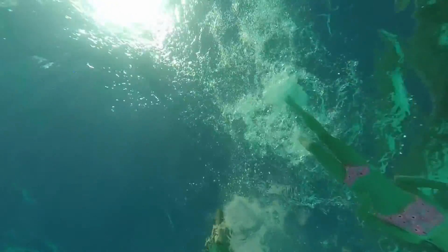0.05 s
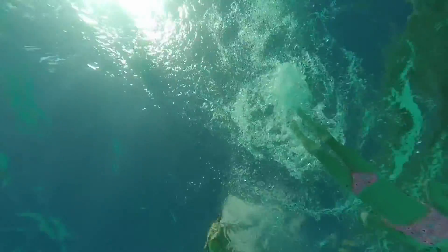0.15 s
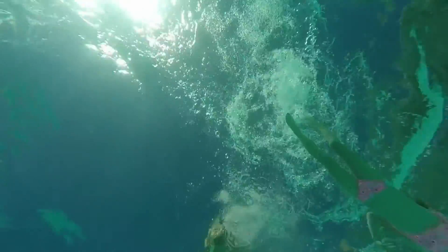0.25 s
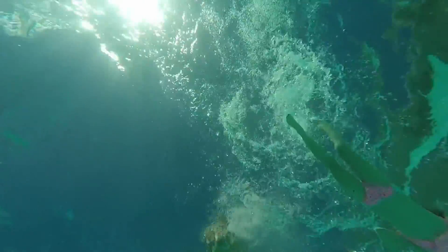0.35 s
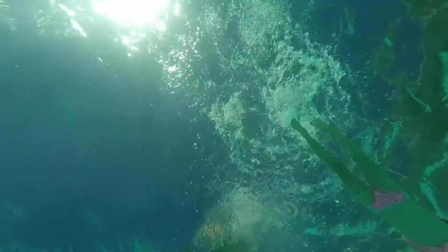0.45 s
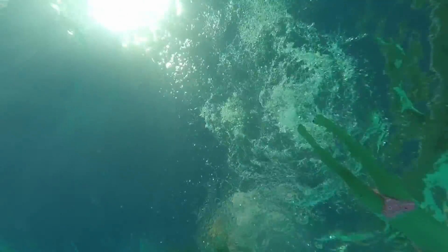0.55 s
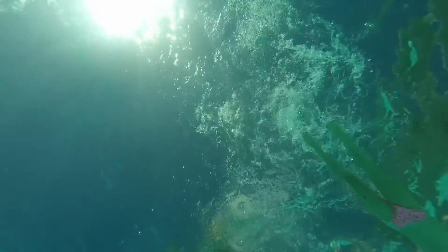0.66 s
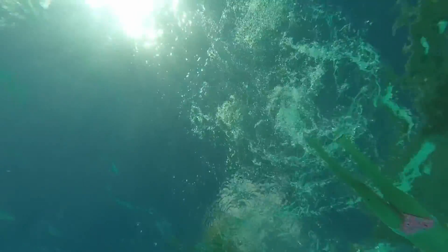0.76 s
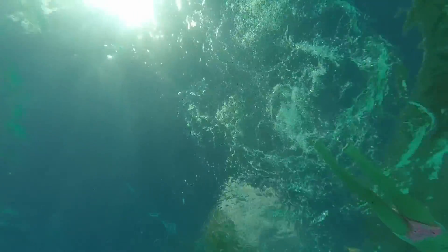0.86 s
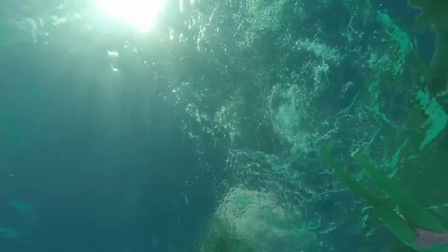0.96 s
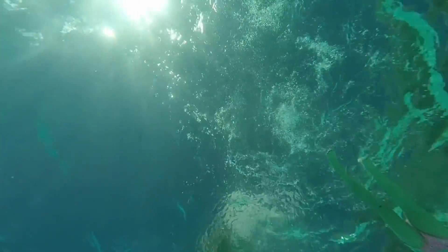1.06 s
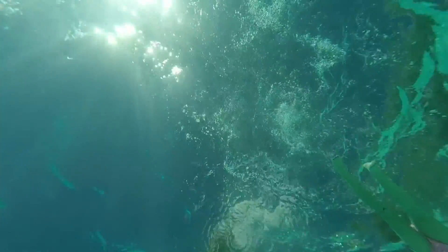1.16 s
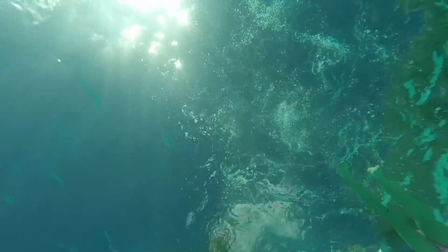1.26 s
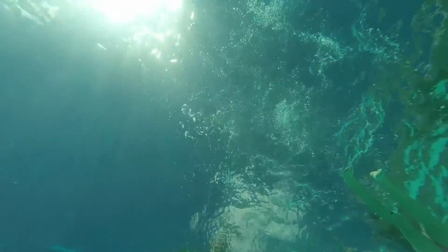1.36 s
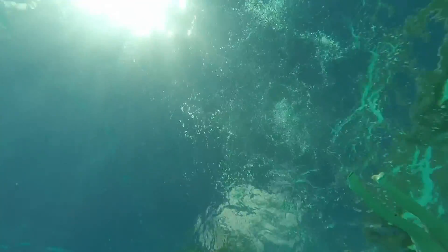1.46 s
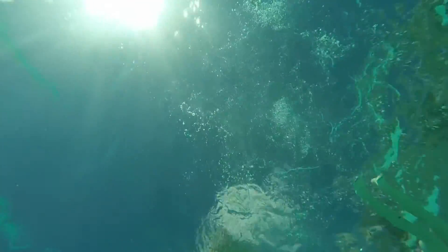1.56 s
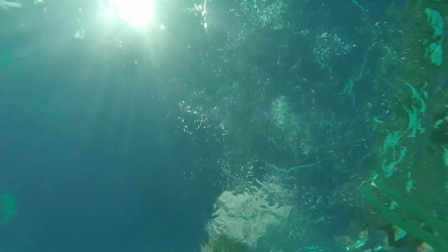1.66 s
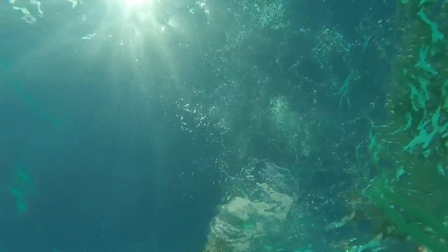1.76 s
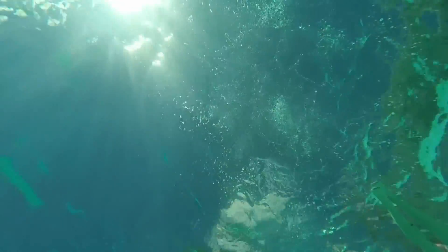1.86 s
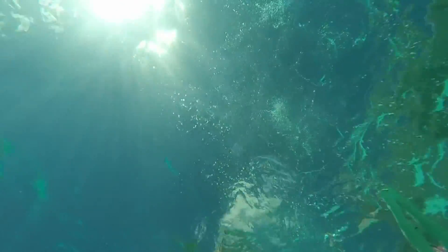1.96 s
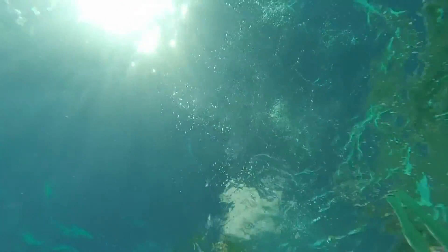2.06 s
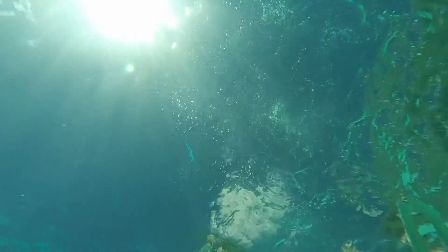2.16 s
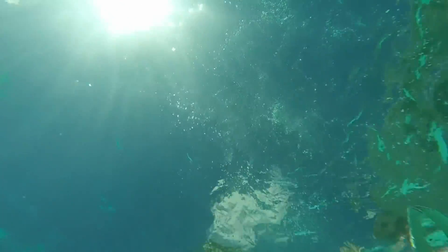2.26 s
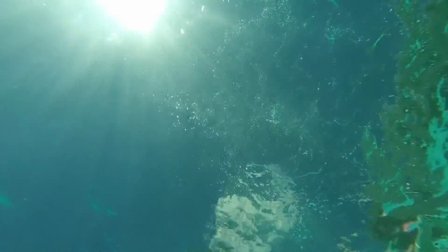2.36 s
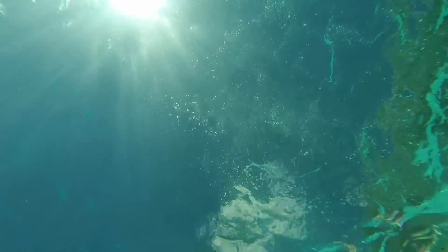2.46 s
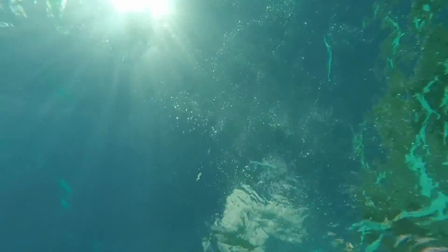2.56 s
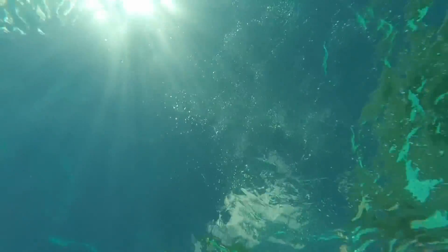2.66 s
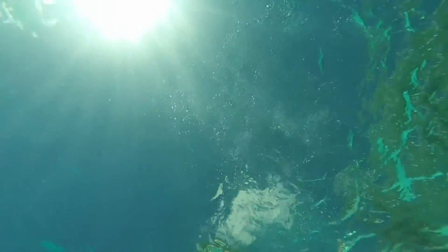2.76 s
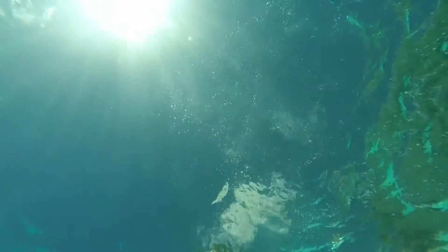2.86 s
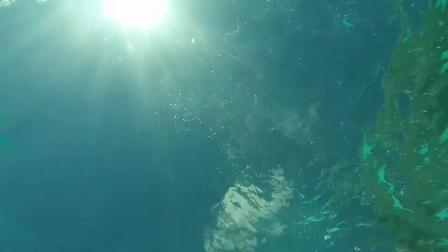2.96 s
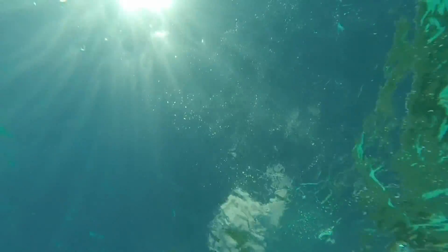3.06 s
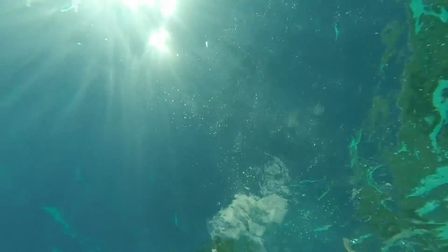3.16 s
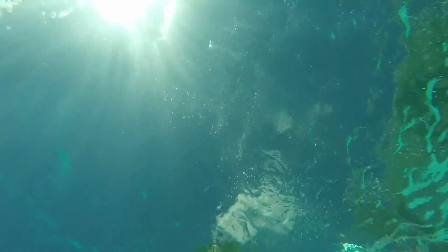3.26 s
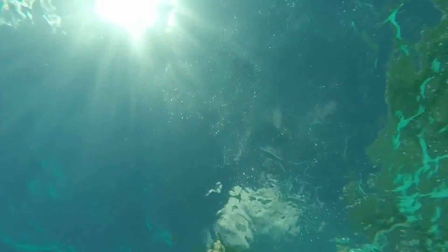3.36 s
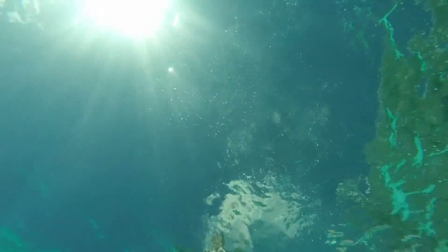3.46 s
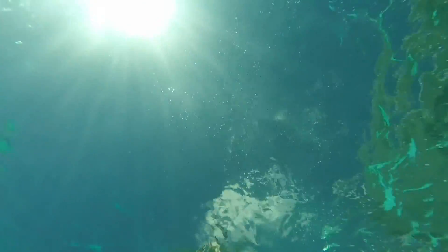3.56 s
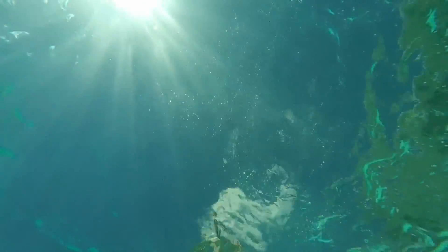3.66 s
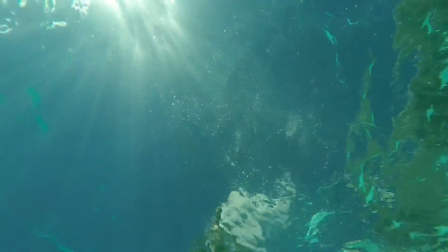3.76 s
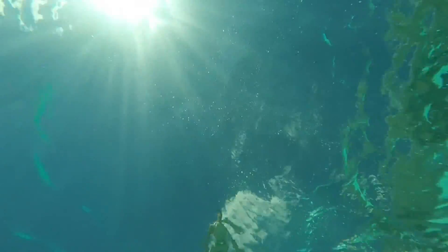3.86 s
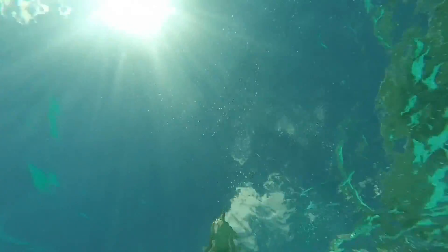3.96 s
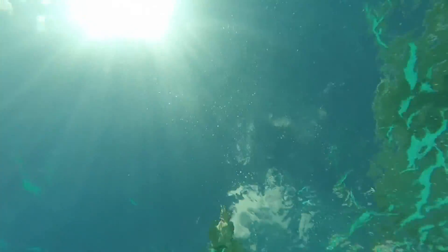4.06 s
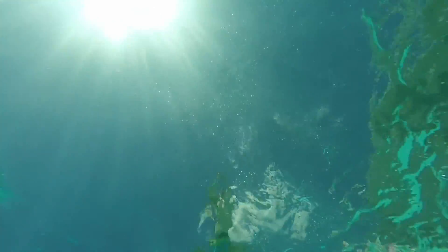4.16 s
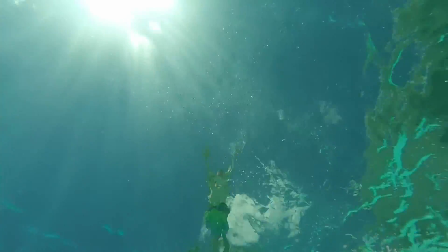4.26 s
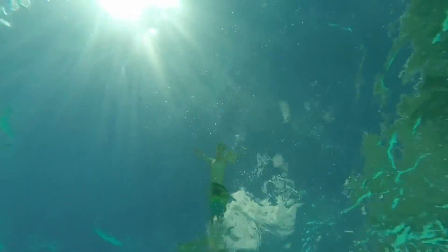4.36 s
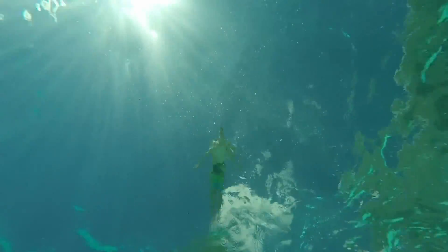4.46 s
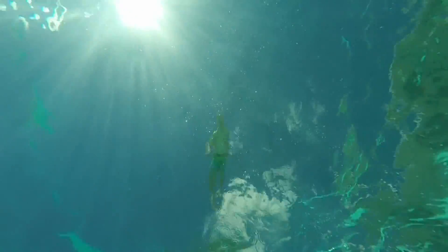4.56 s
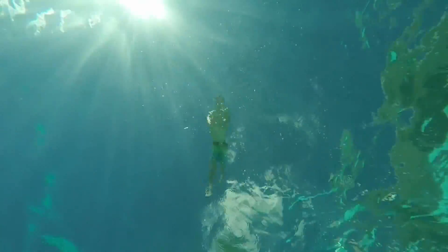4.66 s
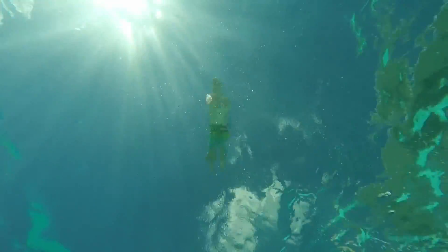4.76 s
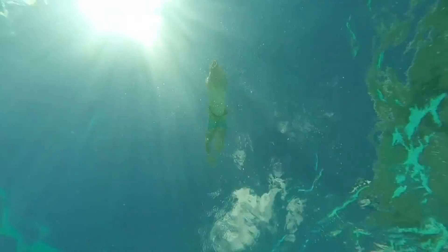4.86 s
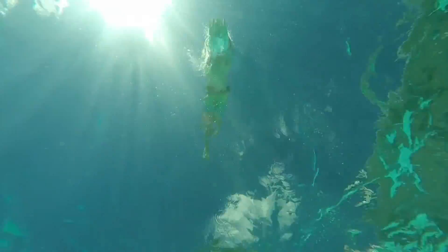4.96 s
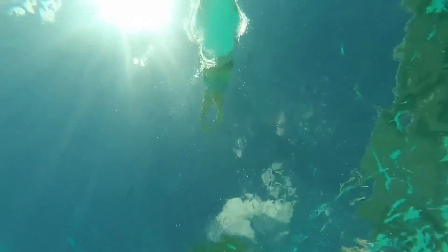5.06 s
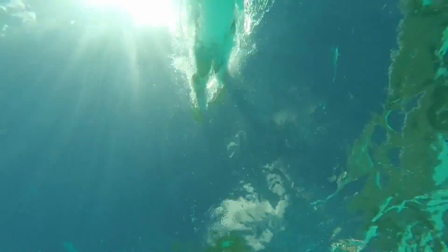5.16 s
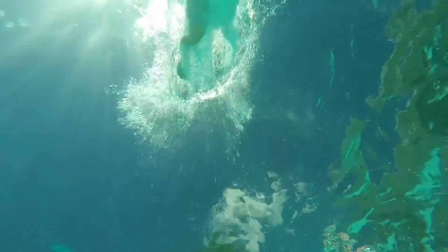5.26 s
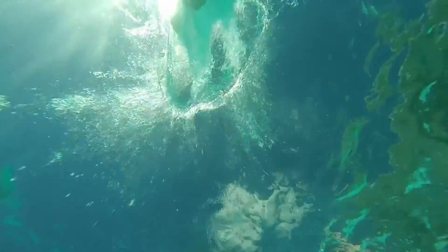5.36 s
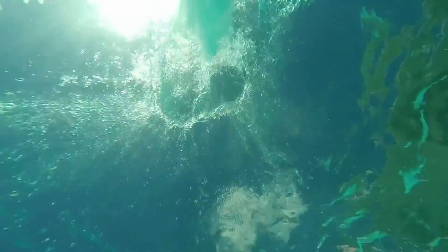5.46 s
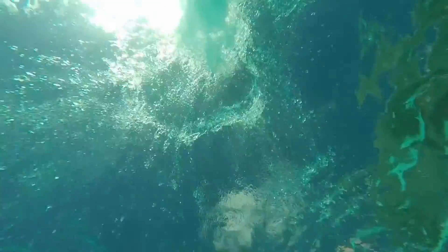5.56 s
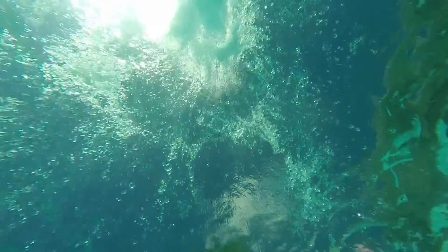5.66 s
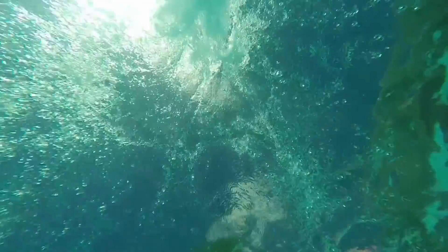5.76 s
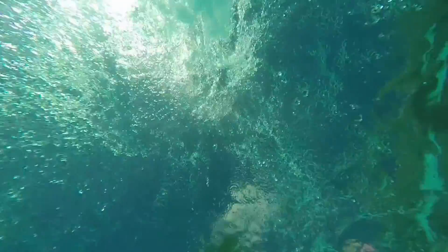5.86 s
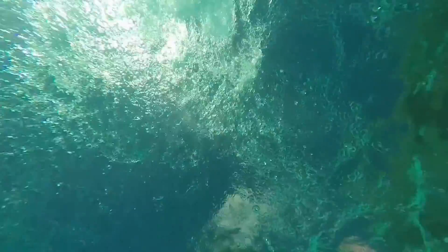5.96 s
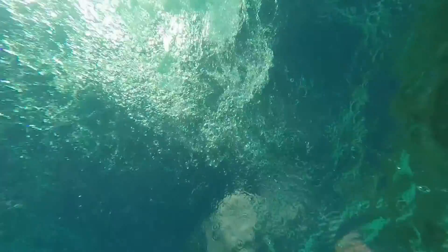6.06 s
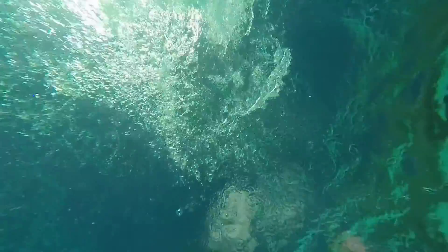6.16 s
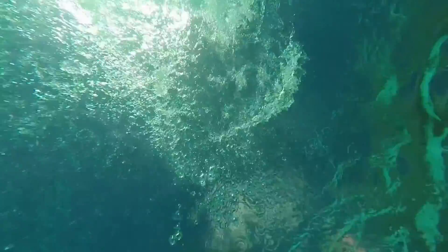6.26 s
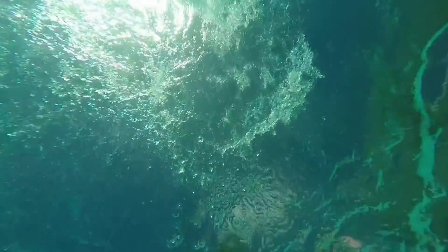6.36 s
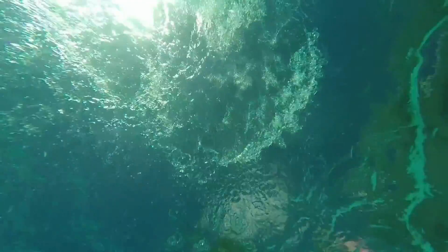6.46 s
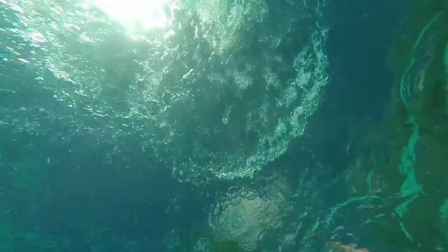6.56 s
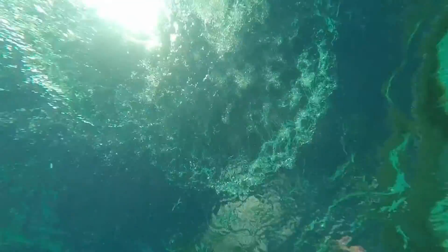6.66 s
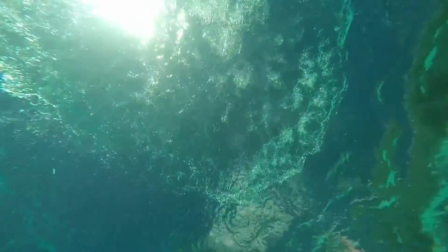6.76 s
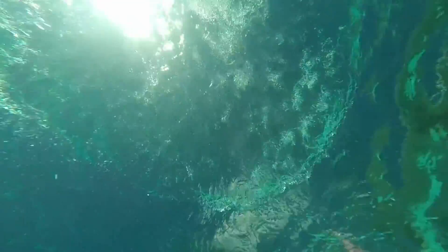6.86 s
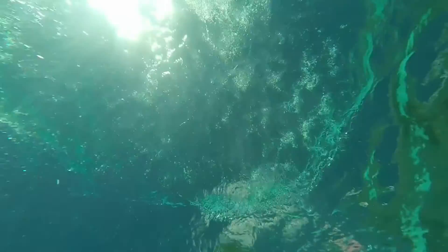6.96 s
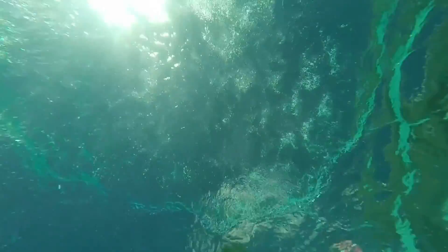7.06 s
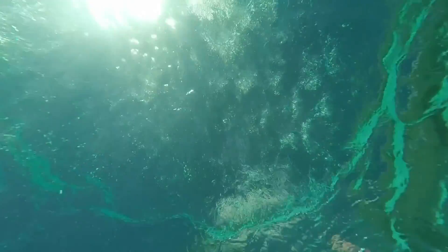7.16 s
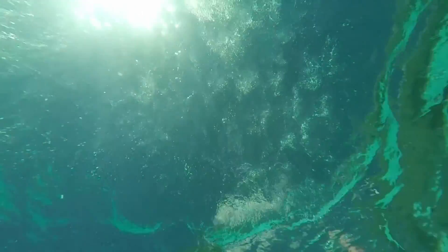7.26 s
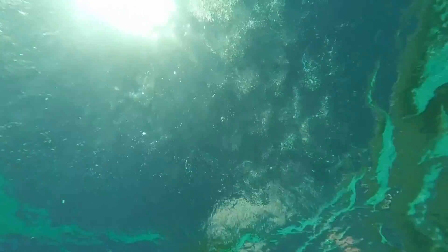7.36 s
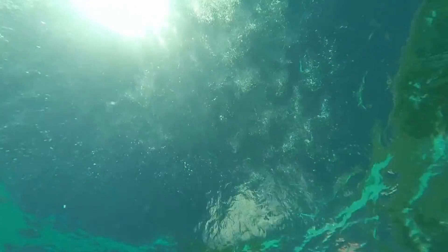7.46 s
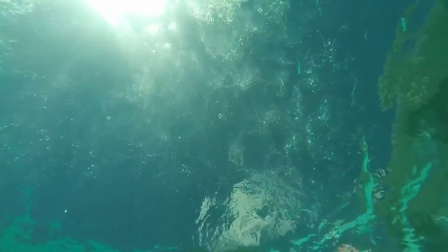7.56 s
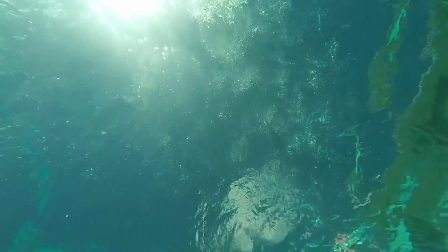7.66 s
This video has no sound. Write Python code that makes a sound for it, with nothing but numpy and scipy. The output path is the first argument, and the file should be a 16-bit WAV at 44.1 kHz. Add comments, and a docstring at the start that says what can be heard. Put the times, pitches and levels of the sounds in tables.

```python
"""Under water, inside a sealed housing, as swimmers jump into the sea.
First a big air pocket bloops and a bubble cloud (short gliding rings over a noise wash) gurgles and fizzes away.
Then a second jumper plunges in: low booms (swelling sines) rock the housing and another cloud builds and fades.
Throughout, single bubbles pop and plink, and a hum, a low stir and hiss lie beneath.
The housing's gain curve muffles clouds, pops, knocks and stray bubbles."""
import sys
import numpy as np
from scipy.fft import rfft, irfft, next_fast_len
from scipy.io import wavfile
from scipy.ndimage import map_coordinates

SR = 44100
rng = np.random.default_rng(int(sys.argv[2]) if len(sys.argv) > 2 else 0)


def to_wav(sig):
    """Store sig (one row per channel, or 1-D mono) as 16-bit WAV at the path in sys.argv[1].

    Samples outside -1..1 are clipped; the rate is SR.
    """
    pcm = np.clip(np.atleast_2d(sig), -1, 1) * 32767
    pcm = np.round(pcm).astype(np.int16)
    wavfile.write(sys.argv[1], SR, pcm.T)  # frames by channels


N = 340452

# hiss spectrum, relative: pitch_hz, density_db
HISS_SPECTRUM = [(100, 9), (600, 12.5), (3000, 7), (7000, 0), (13000, -4), (14300, 1.5), (15000, -6.5)]
# faint far metallic rings: start_s, level_db, hardness_db_per_octave (tilt up the modes)
METAL_STRIKES = [(1.241, -47.5, 7), (1.829, -42, -5), (2.545, -49, 4), (3.331, -47, -4)]
# modes of the metal: pitch_hz, relative_level_db (before the hardness tilt), t60_s
METAL_MODES = [(465, 1, 1.0), (488, -8, 1), (776, -11.5, 0.49), (1410, -19, 0.38)]
# pushes of water that swing the housing: start_s, pitch_hz, peak_db, length_s
HOUSING_SWINGS = [(0.293, 44.7, -15.5, 0.056), (0.785, 59.4, -26, 0.091), (0.863, 44.2, -28.5, 0.13),
                  (1.438, 46.6, -31, 0.12), (1.62, 44, -17, 0.14), (1.745, 77, -27, 0.1),
                  (1.827, 38.6, -22, 0.28), (2.091, 60, -20.5, 0.057), (3.377, 43.5, -31, 0.25),
                  (3.616, 45.8, -28, 0.38), (4, 44.3, -8.5, 0.15), (3.993, 72.7, -15.5, 0.13),
                  (4.209, 70.5, -7, 0.037), (4.251, 82.1, -22, 0.18), (4.256, 43.4, -13.5, 0.2),
                  (4.389, 43.5, -5.5, 0.17), (4.542, 43.6, -9, 0.21), (4.714, 44.5, -13, 0.21),
                  (4.858, 43.9, -7.5, 0.14), (4.992, 45.1, -8.5, 0.17), (5.088, 37.8, -3.5, 0.075),
                  (5.158, 37.5, -7, .11), (5.247, 33.7, -2, 0.087), (5.411, 29.6, -13, 0.098),
                  (5.546, 37.7, -23.5, 1), (6.319, 45, -10.5, 0.099), (6.853, 41, -22.5, 0.087),
                  (7.523, 45.4, -22.5, 0.055)]
# gain through the housing walls: pitch_hz, gain_db
WALL_GAIN = [(30, 2), (200, -1), (350, 4), (470, -11.5), (780, -13.5), (1350, -15), (2000, -19.5),
             (3400, -25), (4300, -30), (5400, -36), (6400, -53.5), (8200, -54.5), (9200, -45.5),
             (11000, -58)]
# resonances (+) and dead bands (-) of the housing: centre_hz, width_hz, gain_db
WALL_BANDS = [(601, 50, -12.5), (826, 28, 4), (988, 120, -4.5), (1290, 37, 2.5), (1544, 22.6, -22.5),
              (2090, 60, 3.5), (2236, 142, -7.5), (2530, 58, 0), (2907, 19, -12.5), (3296, 30, 6.5),
              (4780, 160, -8.5)]
# dull knocks on the housing; the rows at 4.836 and 4.966 s are the low onsets of two bursts of air: start_s,
# relative_level_db, pitch_hz
HOUSING_KNOCKS = [(0.299, -21, 214), (1.058, -40, 335), (1.756, -26, 182), (3.326, -35, 185),
                  (3.443, -35, 199), (3.624, -32.5, 214), (3.76, -37, 227), (4.005, -32, 163),
                  (4.085, -24.5, 233), (4.209, -16, 241), (4.22, -17.5, 171), (4.255, -34.5, 201),
                  (4.382, -32, 177), (4.433, -30.5, 196.5), (4.836, -33, 323), (4.966, -28, 363)]
# sharp pops and small splashes: start_s, relative_level_db, pitch_hz, t60_s
BUBBLE_POPS = [(0.233, -35, 3350, 0.047), (0.271, -33, 890, 0.05), (0.77, -57, 2090, .055),
               (0.79, -46, 1150, .07), (0.976, -60, 1100, .06), (1.121, -45.5, 3760, 0.039),
               (1.237, -41.5, 2830, 0.061), (1.24, -36, 992, 0.14), (1.412, -33.5, 2740, 0.037),
               (1.747, -35.5, 3830, 0.044), (1.829, -34, 1584, .13), (1.9, -36.5, 1290, 0.032),
               (2.129, -36.5, 2440, 0.074), (2.2, -43.5, 1660, .05), (2.449, -47.5, 2030, 0.1),
               (2.762, -40, 2470, 0.068), (3.243, -47, 1440, 0.21), (3.442, -51, 1110, 0.14),
               (3.502, -40.5, 1147, 0.18), (3.877, -49, 2410, 0.073), (3.958, -42, 1285, .072),
               (4.471, -48.5, 1600, 0.1), (4.702, -40, 860, 0.14), (4.813, -38, 1280, .1),
               (4.964, -38, 1900, 0.066), (6.492, -27, 977, 0.092), (7.131, -41.5, 4080, 0.038),
               (7.445, -44, 1830, 0.048)]
# nearest bubbles, clearly pitched: start_s, relative_level_db, pitch_hz
NEAR_BUBBLES = [(0.119, -33.5, 651), (0.995, -53, 1200), (1.411, -47, 1487), (1.9, -40.5, 1170),
                (3.448, -50.5, 1680), (3.507, -47.5, 1700), (4.328, -48, 1880), (4.597, -46, 747),
                (6.38, -35.5, 1650), (7.052, -44.5, 3280), (7.136, -38.5, 1156), (7.254, -45, 1700)]
# big air pockets: start_s, start_hz, end_hz, level_db (before fade and fall), rise_s, length_s,
# fall_db (over the length; negative grows)
AIR_POCKETS = [(0.0, 136.6, 139, 0.5, 0.0019, 0.11, 36), (0.083, 321, 339, -20.5, 0.0058, 0.026, -4.5),
               (0.301, 85, 123.5, -6, 0.0066, 0.12, 21), (.42, 114, 176, -29, 0.017, 0.092, -1),
               (.48, 180, 225, -19.5, 0.038, 0.056, 10), (1.2, 330, 286, -38.5, 0.011, 0.15, 13),
               (5.152, 405, 353, -16.5, 0.023, 0.045, 5), (5.745, 234.7, 127.6, -21.5, 0.033, 0.15, 9),
               (5.79, 150, 90, -21, 0.021, 0.11, -3), (5.97, 121, 165, -22, 0.033, 0.087, 8),
               (6.08, 171.4, 120.5, -23, 0.039, 0.079, 5), (7.155, 334, 324, -24, 0.012, 0.069, 11)]
# air driven in by kicks, the plunge and the cloud rising behind it: start_s, rise_s, hold_s, fall_db_per_s,
# level_db, big_db (big bubbles re level), fine_db (fine bubbles re level); all before the layer trims
AIR_SURGES = [(0, .012, .22, 34, -42, 8, -13), (.238, .03, .06, 60, -45, 9, -14),
              (.42, .05, .11, 110, -54, 12, -1), (1.476, .11, .14, 36, -53, -1, 4.5),
              (1.747, .08, .32, 30, -54.5, 8, -3), (2.532, .012, .04, 110, -60, 2, 3),
              (2.819, .035, .01, 150, -60, -3.5, 4.5), (2.929, .05, .12, 40, -65, 7, 0),
              (3.235, .13, .19, 90, -61, 7.5, -4), (3.94, 0.022, .08, 22, -55, 2, -6),
              (4.135, .05, .16, 55, -52, 1, -5), (4.56, .03, .03, 98, -54, -8.5, -9),
              (4.808, .012, .035, 170, -45, 3, -20), (4.953, .008, .29, 21, -40.5, 6.5, -3.5),
              (5.01, .1, .135, 113, -33, 11.5, -3.5), (5.39, .49, .41, 20, -46.5, 14.5, -2),
              (5.946, .474, .13, 20, -39, 9.5, -6), (6.708, .15, .32, 12, -53.5, 19.5, -13.5)]
# bubble levels between surges, before the layer trims: big_db, middling_db, fine_db
CALM_LEVELS_DB = [-62, -71, -71]
# churning of the largest pockets: start_s, relative_level_db
CHURN_LEVEL = [(.03, -44), (.45, -44), (.65, -56.5), (1.4, -59), (1.8, -43), (2.1, -41), (2.8, -58),
               (3.398, -52), (3.898, -62), (4.1, -46), (4.9, -53), (5.171, -29.5), (5.38, -45.5),
               (5.68, -43), (6, -31.5), (6.402, -38), (7.252, -39), (7.7, -46)]

TOP_HZ = 15300
BOOM_RISE_S = 0.016
THICK_DB = -40  # cloud level that counts as thick
# stray bubbles: level outside the housing in a thick cloud, dB per dB of cloud level, spread, pitch range
STRAYS_PER_S, STRAY_DB, STRAY_FOLLOWS, STRAY_SPREAD_DB = 24, -29, .55, 5
STRAY_LO_HZ, STRAY_HI_HZ = 1150, 4200


def amp(db):
    """Decibels to gain."""
    return 10 ** (np.asarray(db) / 20)


def unit(x):
    """Scale to rms 1."""
    return x / np.sqrt(np.mean(x ** 2) + 1e-20)


def along(points, hz):
    """Interpolate (Hz, value) points on a log frequency axis."""
    f, v = np.transpose(points)
    return np.interp(np.log(hz + 1), np.log(f + 1), v)


def wobble(knots_per_s):
    """A smooth random curve through normal knots."""
    knots = rng.standard_normal(int(N * knots_per_s / SR) + 4)
    return map_coordinates(knots, [np.arange(N) * knots_per_s / SR])


def seconds(length_s):
    """A time axis."""
    return np.arange(int(length_s * SR)) / SR


def add(track, start_s, sound):
    """Mix a sound in at start_s."""
    part = track[max(round(start_s * SR), 0):][:len(sound)]
    part += sound[:len(part)]


def coloured(x, gain):
    """Causal minimum-phase filter with the given gain over frequency, by folding the cepstrum."""
    m = 2 * next_fast_len(len(x) // 2 + 2048)
    log_gain = np.log(np.maximum(gain(np.fft.rfftfreq(m, 1 / SR)), 1e-6))
    cepstrum = irfft(log_gain)
    cepstrum[1:m // 2] *= 2
    cepstrum[m // 2 + 1:] = 0
    return irfft(rfft(x, m) * np.exp(rfft(cepstrum)))[:len(x)]


def band(hz, lo_hz, hi_hz, order=5):
    """Gain of a band-pass."""
    low_side = 1 + (lo_hz / (hz + 1)) ** (2 * order)
    high_side = 1 + (hz / hi_hz) ** (2 * order)
    return (low_side * high_side) ** -.5


def housing(hz):
    """Gain of the housing walls: muffled treble, with resonances and dead bands."""
    bands_db = sum(db * np.exp(-.5 * ((hz - centre_hz) / width_hz) ** 2)
                   for centre_hz, width_hz, db in WALL_BANDS)
    return amp(along(WALL_GAIN, hz) + bands_db)


def swell(t, rise_s, length_s):
    """A smooth rise to 1 and fall to 0."""
    return np.sin(np.pi / 2 * np.interp(t, [0, min(rise_s, length_s), length_s], [0, 1, 0]))


def background():
    """A wavering low hum, the slow stir of the sea as low band noise, and microphone hiss."""
    phase = 2 * np.pi * 59.2 * np.arange(N) / SR + .2 * wobble(5.0)
    hum = amp(-42.5 + wobble(2.6)) * np.sqrt(2) * np.sin(phase)
    stir = amp(-45) * unit(coloured(rng.standard_normal(N), lambda f: band(f, 30, 59.8, order=6)))
    hiss = amp(-64.5) * unit(coloured(rng.standard_normal(N), lambda f: amp(along(HISS_SPECTRUM, f))))
    return hum + stir + hiss


def clangs():
    """A distant metallic ring: decaying modes, two of them close and low, with slightly unsteady phase."""
    out, t = np.zeros(N), seconds(0.58)
    base_hz = METAL_MODES[0][0]
    for start_s, db, hardness_db in METAL_STRIKES:
        waver = 0.54 * wobble(16)[:len(t)]
        ring = np.zeros(len(t))
        for hz, mode_db, t60_s in METAL_MODES:
            decay_db = mode_db + hardness_db * np.log2(hz / base_hz) - 60 * t / t60_s
            ring += amp(decay_db) * np.sin(2 * np.pi * (hz * t + rng.random()) + waver)
        add(out, start_s, ring * amp(db) * swell(t, 0.022, t[-1]))
    return out


def booms():
    """Each push of water swings the housing: a low sine that swells and dies."""
    out = np.zeros(N)
    for start_s, hz, db, length_s in HOUSING_SWINGS:
        t = seconds(length_s)
        envelope = swell(t, BOOM_RISE_S, length_s) ** 1.18
        add(out, start_s, amp(db) * envelope * np.sin(2 * np.pi * hz * t))
    return out


def burst(hz, t60_s, width, ring_db, attack_s, order):
    """A decaying tone in noise, banded around its pitch and heard through the housing; peak 1."""
    t = seconds(.25)
    source = rng.standard_normal(len(t)) + amp(ring_db) * np.sin(2 * np.pi * hz * t)
    source *= 1000. ** (-t / t60_s) * (1 - np.exp(-t / attack_s))
    heard = coloured(source, lambda f: band(f, hz / width, hz * width, order) * housing(f))
    return heard / np.abs(heard).max()


def knocks():
    """Water knocks the housing, and two bursts of air start low: narrow, slower-starting low bursts."""
    out = np.zeros(N)
    for start_s, db, hz in HOUSING_KNOCKS:
        knock = burst(hz, t60_s=0.12, width=1.166, ring_db=-20.0, attack_s=0.0045, order=7)
        add(out, start_s, amp(db - 2.5) * knock)
    return out


def pops():
    """Near bubbles pop in a puff of spray: wider bursts with a sharp attack."""
    out = np.zeros(N)
    for start_s, db, hz, t60_s in BUBBLE_POPS:
        pop = burst(hz, t60_s, width=1.61, ring_db=-16.0, attack_s=0.00017, order=4)
        add(out, start_s, amp(db + 3.5) * pop)
    return out


def snap():
    """One bright snap: decaying band noise, unmuffled."""
    out, t = np.zeros(N), seconds(.03)
    noise = rng.standard_normal(len(t)) * amp(-60 * t / 0.013)
    add(out, 1.756, amp(-39.5) * coloured(noise, lambda f: band(f, 3000, 13000, order=2)))
    return out


def plink(hz, t60_s, attack_s, climb):
    """One bubble pinches off, swells and rings out while its pitch climbs; peak 1."""
    t = seconds(.1)
    ring = np.sin(2 * np.pi * hz * t * (1 + climb * t / t60_s))
    ring *= (1 - np.exp(-t / attack_s)) * 1000. ** (-t / t60_s)
    return ring / np.abs(ring).max()


def plinks(cloud_db):
    """Bubbles standing out from the cloud; strays are louder where it is thick, small ones die sooner."""
    out = np.zeros(N)
    when, pitch, size = rng.random((int(STRAYS_PER_S * N / SR), 3)).T
    stray_hz = STRAY_LO_HZ * (STRAY_HI_HZ / STRAY_LO_HZ) ** pitch
    over_thick_db = cloud_db[(when * N).astype(int)] - THICK_DB
    outside_db = STRAY_DB + STRAY_FOLLOWS * over_thick_db + STRAY_SPREAD_DB * size
    heard_db = outside_db + 20 * np.log10(housing(stray_hz))
    for start_s, db, hz in zip(when * N / SR, heard_db, stray_hz):
        add(out, start_s, amp(db) * plink(hz, t60_s=.05 * (1000 / hz) ** .6, attack_s=.002, climb=.02))
    for start_s, db, hz in NEAR_BUBBLES:
        near = plink(hz, t60_s=.058 * (1000 / hz) ** 0.53, attack_s=0.009, climb=0.061)
        add(out, start_s, amp(db + 3.0) * near)
    return out


def bloops():
    """A big pocket's pitch glides: up as it nears the surface, down as it is dragged under."""
    out = np.zeros(N)
    for start_s, start_hz, end_hz, db, rise_s, length_s, fall_db in AIR_POCKETS:
        t = seconds(length_s)
        hz = start_hz * (end_hz / start_hz) ** (t / length_s)
        phase = 2 * np.pi * np.cumsum(hz) / SR
        fade = np.sin(np.pi / 2 * np.clip(np.minimum(t / rise_s, (length_s - t) / 0.028), 0, 1))
        add(out, start_s, np.sin(phase) * amp(db - fall_db * t / length_s) * fade)
    return out


def surges():
    """Driving level in dB of big, middling and fine bubbles: each surge builds, holds and dies away."""
    t = np.arange(N) / SR
    power = amp(CALM_LEVELS_DB)[:, None] ** 2 * np.ones(N)
    for start_s, rise_s, hold_s, fall_db_per_s, db, big_db, fine_db in AIR_SURGES:
        falling_s = np.maximum(t - start_s - rise_s - hold_s, 0)
        envelope = np.clip((t - start_s) / rise_s, 0, 1) * amp(db - fall_db_per_s * falling_s)
        power += amp([big_db, 0, fine_db])[:, None] ** 2 * envelope ** 2
    return 10 * np.log10(power)


def cloud(level_db, lo_hz, hi_hz, bubbles_per_s, cycles, spread_db, wash_db, crowding):
    """Bubbles of one size range ring briefly; the louder the cloud, the more they crowd together."""
    level = amp(level_db)
    density = (level / level.max()) ** crowding
    born = np.cumsum(density) / SR
    count = int(bubbles_per_s * born[-1])  # rate at the loudest moment
    when, pitch, size, life = rng.random((count, 4)).T
    start = np.minimum(np.searchsorted(born, when * born[-1]), N - 1)
    hz = (lo_hz + pitch * (hi_hz - lo_hz))[:, None]
    t = seconds(min(cycles / lo_hz, .2))
    age = t * hz / (cycles * (.5 + life[:, None]))  # 1 at 60 dB down
    # pitch climbs a little as each rings out
    rings = np.sin(2 * np.pi * hz * t * (1 + .04 * age)) * 1000. ** -age
    # undo the density in the strength: level is applied at the end
    strength = amp(spread_db * np.minimum(-np.log(1 - size), 3.5)) / np.sqrt(density[start])
    sample = start[:, None] + np.arange(len(t))
    weighted = rings * np.sqrt(hz) * strength[:, None]
    grains = np.bincount(sample.ravel(), weighted.ravel(), N)[:N]
    # where thick, countless bubbles merge into a wash
    share = amp(wash_db) * np.sqrt(density)
    wash = rng.standard_normal(N) * np.sqrt(SR / 2 / (hi_hz - lo_hz))
    mix = (unit(grains) + share * wash) / np.hypot(1, share)
    return level * unit(coloured(mix, lambda f: band(f, lo_hz, hi_hz) * housing(f)))


def foam(big_db, middling_db, fine_db):
    """Entrained air from big pockets to fine fizz; level flurries, deepest where the cloud is thin."""
    coarse_db = .35 * (middling_db - fine_db)  # a coarse cloud glugs more
    churn_db = np.interp(np.arange(N) / SR, *np.transpose(CHURN_LEVEL))
    churn = amp(2.5) * cloud(churn_db, 78, 209.6, bubbles_per_s=150, cycles=11,
                             spread_db=4.0, wash_db=-5.5, crowding=.3)
    gurgle = amp(0.5) * cloud(big_db, 183.7, 484, bubbles_per_s=350, cycles=44,
                              spread_db=2, wash_db=-5.0, crowding=.45)
    glug = amp(-4) * cloud(middling_db + coarse_db, 458, 1072, bubbles_per_s=1800, cycles=27.4,
                           spread_db=4.5, wash_db=-6.0, crowding=.62)
    babble = amp(-0.5) * cloud(middling_db, 1101, 2300, bubbles_per_s=4000, cycles=34,
                               spread_db=1.5, wash_db=-1.5, crowding=.7)
    fizz = cloud(fine_db, 2270, 14000, bubbles_per_s=12000, cycles=61,
                 spread_db=5.5, wash_db=4.5, crowding=.78)
    flurry_db = 1.1 + 0.035 * np.maximum(THICK_DB - middling_db, 0)
    flurries = amp(flurry_db * wobble(30))
    return churn + amp(1.1 * wobble(12)) * gurgle + flurries * (glug + babble + fizz)


def scene():
    """Everything reaches one microphone."""
    big_db, middling_db, fine_db = surges()
    mix = background() + clangs() + booms() + knocks() + pops() + snap()
    mix += plinks(fine_db) + bloops() + foam(big_db, middling_db, fine_db)
    return mix[None]


def record(dry):
    """Cut everything above the band limit TOP_HZ."""
    m = next_fast_len(N + SR // 2)
    passed = np.fft.rfftfreq(m, 1 / SR) < TOP_HZ
    return irfft(rfft(dry, m) * passed, m)[:, :N]


dry = scene()
out = record(dry)
to_wav(out)
```